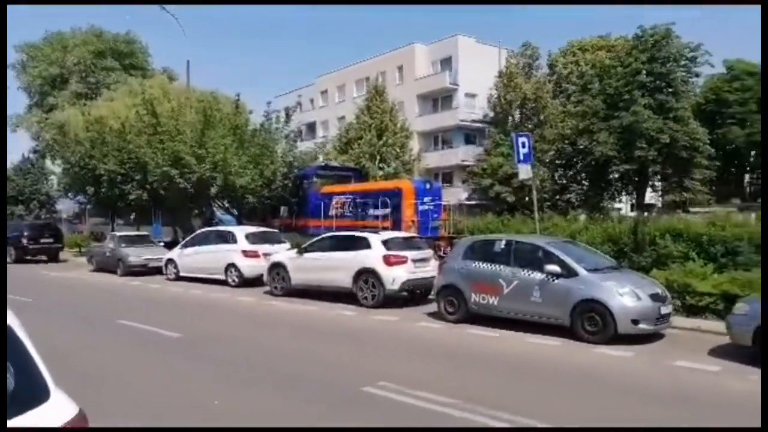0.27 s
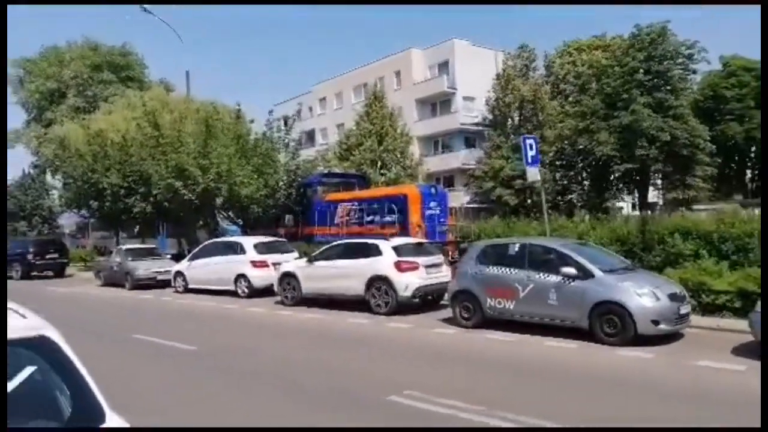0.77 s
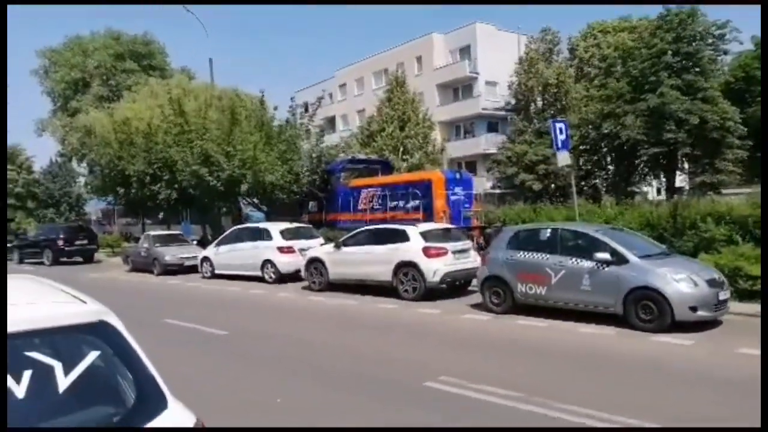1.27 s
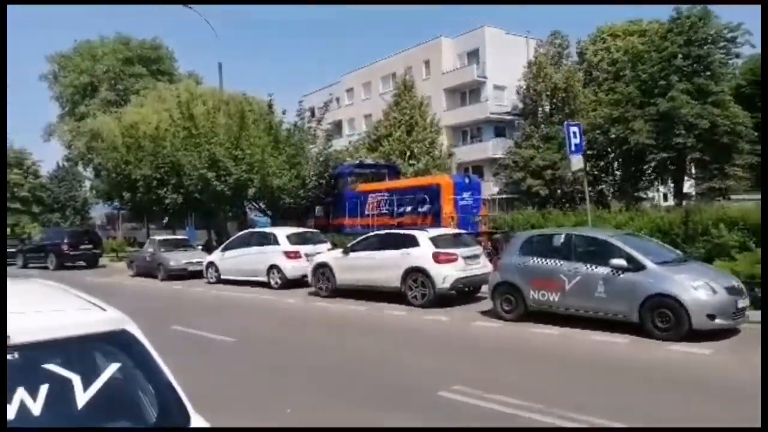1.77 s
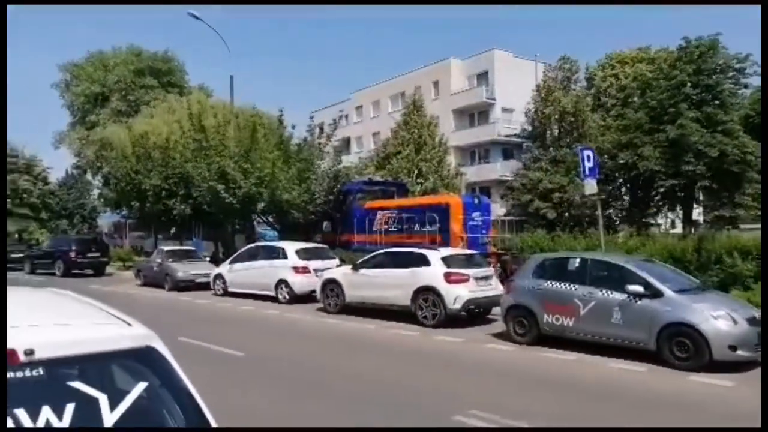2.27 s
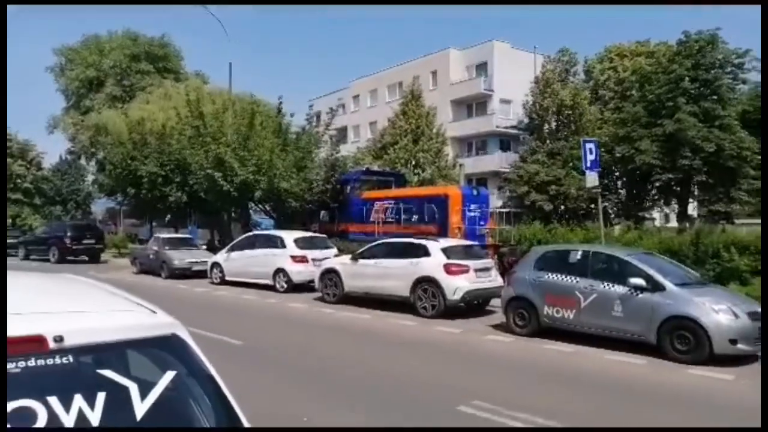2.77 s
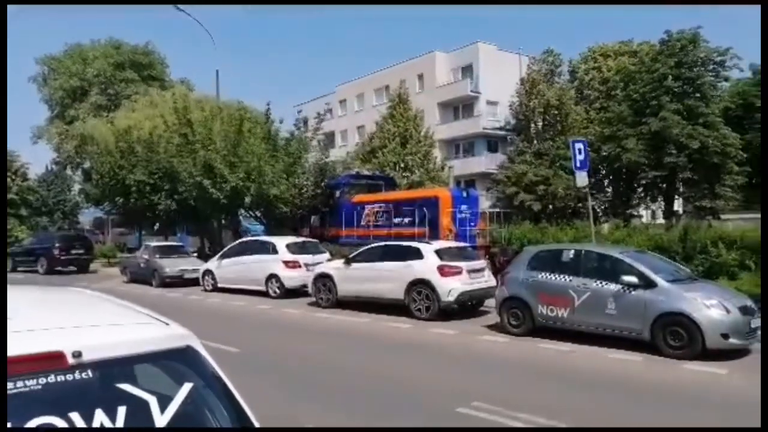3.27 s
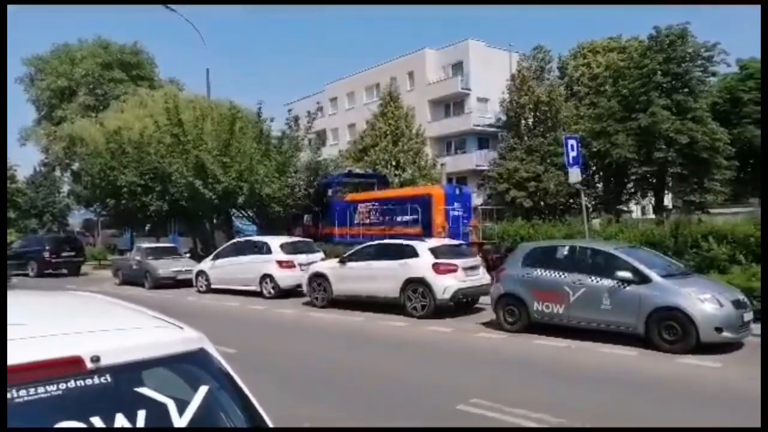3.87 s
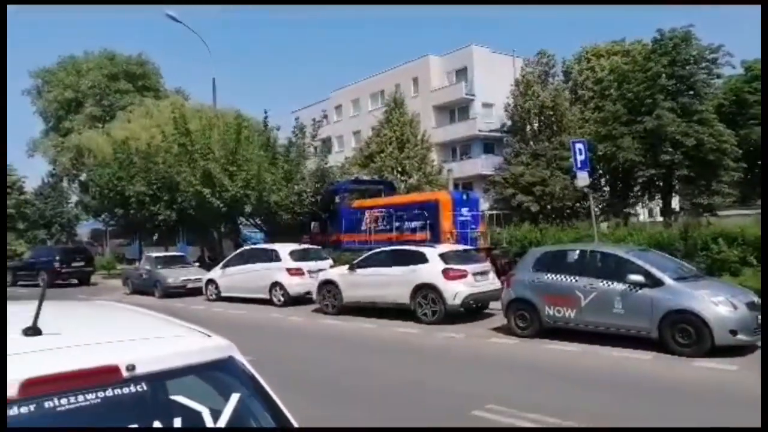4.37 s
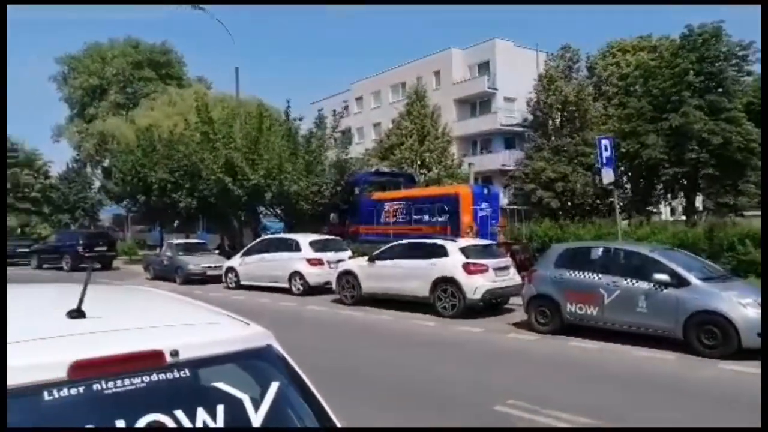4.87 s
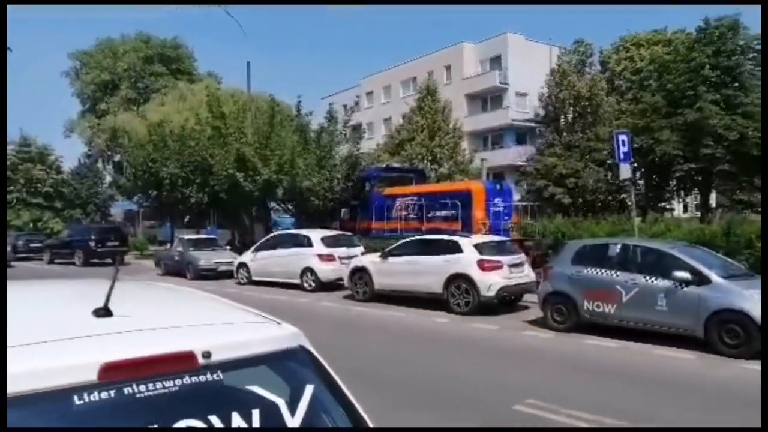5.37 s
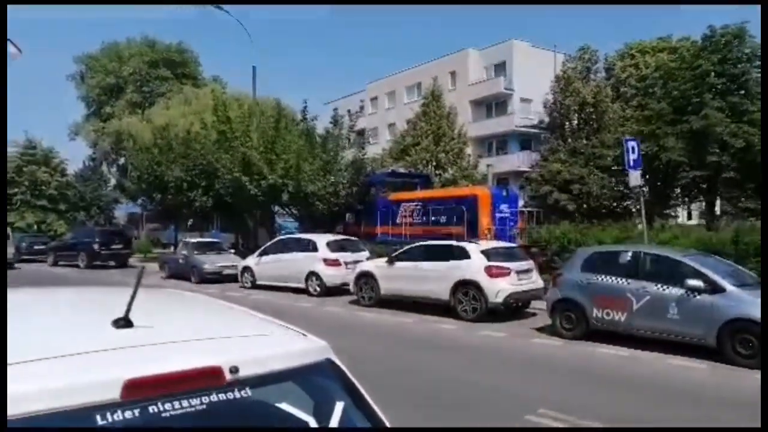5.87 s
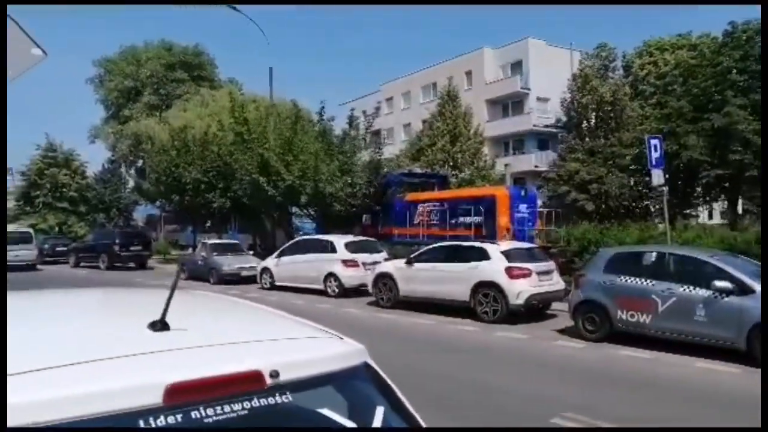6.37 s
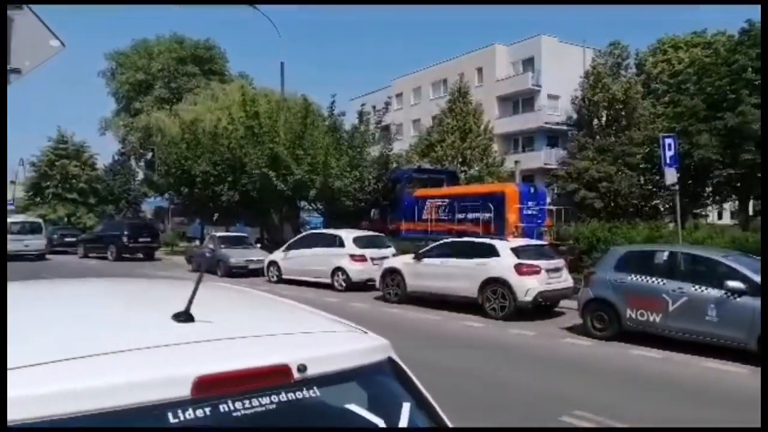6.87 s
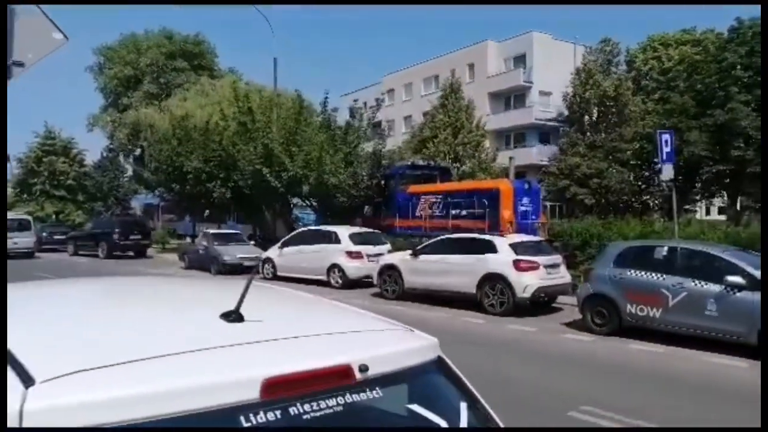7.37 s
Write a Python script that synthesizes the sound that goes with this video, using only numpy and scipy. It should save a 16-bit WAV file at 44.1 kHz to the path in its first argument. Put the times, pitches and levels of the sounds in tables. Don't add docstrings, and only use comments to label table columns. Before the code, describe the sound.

Steady low engine drone and airy hiss with faint metal ticks, then a two-second echoing air-horn blast that sags, and the engine taking load.

```python
import sys
import numpy as np
from scipy import signal
from scipy.fft import rfft, irfft, next_fast_len
from scipy.io import wavfile
from scipy.ndimage import map_coordinates

SR = 44100
rng = np.random.default_rng(int(sys.argv[2]) if len(sys.argv) > 2 else 0)


def level_to_linear(level):
    exponent = np.asarray(level, float) / 20
    return 10 ** exponent


def inscribe(sig):
    pcm = np.round(np.clip(np.atleast_2d(sig).T, -1, 1) * 32767)
    wavfile.write(sys.argv[1], SR, pcm.astype(np.int16))


N = 336483


def unit(x):
    return x / np.sqrt(np.mean(x ** 2) + 1e-20)


def along(points, hz):
    f, v = np.transpose(points)
    return np.interp(np.log(hz + 1), np.log(f + 1), v)


def curves(rows):
    s, *cols = np.transpose(rows)
    return [np.interp(np.arange(N) / SR, s, c) for c in cols]


def ramp(start_s, length_s):
    return np.clip((np.arange(N) / SR - start_s) / length_s, 0, 1)


def wobble(rate, size=1):
    step = np.arange(0, N + 64, 64)
    knots = rng.standard_normal(int(N * rate / SR) + 4)
    return np.interp(np.arange(0, N, size), step, map_coordinates(knots, [step * rate / SR]))


def filtered(x, response):
    m = next_fast_len(N + SR // 2)
    return irfft(rfft(x, m) * response(np.fft.rfftfreq(m, 1 / SR)), m)[..., :N]


# frequency in Hz, left-right correlation from -1 to 1.
ALIKE = [(60, 0.93), (130, 0.91), (290, 0.87), (630, 0.67), (1380, 0.25), (3010, 0.68), (6590, 0.22),
         (14400, -0.1)]


def rush(gain):
    turn = lambda hz: np.arccos(np.clip(along(ALIKE, hz), -1, 1)) / 2
    mid_side = lambda hz: gain(hz) * [np.cos(turn(hz)), np.sin(turn(hz))]
    mid, side = filtered(rng.standard_normal((2, N)), mid_side)
    return unit(np.array([mid + side, mid - side]))


def throttle():
    return ramp(5.93, 0.73)


# time in seconds, level in dB.
TRAFFIC = [(0, -48.5), (.5, -43.5), (1.3, -49), (3, -47.5), (3.8, -45.5), (6.8, -40), (7.63, -45.5)]
# frequency in Hz, density in dB per Hz.
RUMBLE = [(12, -47.5), (20, -13.5), (60, -6), (143, -3.5), (216, -8), (365, -11), (450, -26), (700, -54.5)]


def street_rumble():
    rumble_db = curves(TRAFFIC)[0] + 2 * throttle()
    return level_to_linear(rumble_db + 0.5 * wobble(3)) * rush(lambda hz: level_to_linear(along(RUMBLE, hz)))


# time in seconds, peak level in dB.
TICKS = [(0.4798, -57), (2.6379, -57), (2.6893, -48), (3.471, -59), (3.8477, -58)]
# time in seconds, peak level in dB.
SPITS = [(0.7567, -61), (2.6893, -64), (3.471, -68), (7.0494, -58)]
# time in seconds, peak level in dB.
KNOCKS = [(0.0544, -46), (0.2224, -46), (0.2344, -45)]


def metal_ticks():
    when, size = rng.random(size=14), rng.standard_normal(size=14)
    crackle = list(zip(when * (N / SR - .1), -69 + 1.5 * size))
    clicks = ticks(TICKS, low_hz=3500, high_hz=12000)
    clicks += ticks(SPITS + crackle, low_hz=8500, high_hz=13000)
    return clicks + level_to_linear(10) * ticks(KNOCKS, low_hz=2500, high_hz=4500)


def ticks(events, low_hz, high_hz):
    out, t = np.zeros((2, N)), np.arange(600) / SR
    for s, db in events:
        common, own = rng.standard_normal(len(t)), rng.standard_normal((2, len(t)))
        out[:, round(s * SR):][:, :len(t)] += level_to_linear(db + 4 - 60 * t / .016) * (common + .6 * own)
    return filtered(out, lambda hz: 1 / (1 + (low_hz / (hz + 1)) ** 4) / (1 + (hz / high_hz) ** 8))


# frequency in Hz, rms level in dB.
WHINES = [(294.8, -52), (354.3, -56.5), (521.5, -62), (430, -77.5)]


def whines():
    total = 0
    for hz, db in WHINES:
        level = level_to_linear(db + 1.5 * wobble(5))
        total = total + level * np.sin(2 * np.pi * hz * np.arange(N) / SR + .4 * wobble(6))
    return total


# centre in Hz, half width in Hz, level in dB.
BLOWER = [(3800, 110, 3), (5740, 430, -7.5), (9350, 400, -18), (2020, 400, -5.5)]


def blower(load, hiss_db):
    bands = lambda hz: sum(level_to_linear(db) / (1 + ((hz - centre) / width) ** 2) for centre, width, db in BLOWER)
    return level_to_linear(hiss_db - 12 + 1.7 * load + 1.6 * wobble(8.7)) * rush(bands)


# frequency in Hz, density in dB per Hz.
HISS = [(200, -42), (408, -7.5), (700, -2.5), (989, -8.5), (1300, -8), (1950, -5.5), (2600, -11),
        (3250, -17.5), (4500, -18.5), (6200, -21), (7000, -30.5), (8600, -31.5), (10800, -38.5),
        (14900, -60.5)]


def chopped_hiss(load, shaft, hiss_db):
    top_db = -2.5 + 7 * np.exp(-np.arange(N) / SR / 0.37)
    firing = 1 + .06 * np.sin(shaft)
    for order in (3, 4, 12):
        firing += .05 * np.sin(order * shaft)
    hiss = rush(lambda hz: level_to_linear(along(HISS, hz)))
    over = lambda edge_hz: filtered(hiss, lambda hz: 1 / (1 + (edge_hz / (hz + 1)) ** 8))
    load_change = (level_to_linear(-2.5 * load) - 1) * over(4200)
    tyres_change = (level_to_linear(top_db + .8 * wobble(17)) - 1) * over(6800)
    return (hiss + load_change + tyres_change) * level_to_linear(hiss_db + 0.86 * wobble(4)) * firing


# multiple of the shaft rate, level in dB.
EXHAUST = [(0.5, -33), (1, -31), (1.5, -23), (2, -17), (2.5, -24.5), (3, -14), (3.5, -19.5), (4, -7.5),
           (4.5, -11), (5, -17.5), (5.5, -13.5), (6, -16.5), (6.5, -12.5), (7, -18.5), (7.5, -20), (8, 1.5),
           (8.5, -9.5), (9, -18.5), (9.5, -11), (10, -10.5), (10.5, -18.5), (11, -17.5), (11.5, -21.5),
           (12, -15.5), (12.5, -24.5), (13, -33.5), (13.5, -28), (14, -24.5), (14.5, -19), (15, -15)]
# multiple of the shaft rate, gain in dB.
LOADED = [(1, 4.5), (3.5, 10.5), (4, 13.5), (4.5, 3.5), (8, -1.5), (15, 0.5)]


def exhaust(load, shaft):
    sway = lambda rate: wobble(rate, size=16)
    drone = 0
    for order, db in EXHAUST:
        sway_db = 1.7 * sway(5.3) + 0.51 * np.array([sway(3.8), sway(9.4)])
        drift = rng.uniform(0, 2 * np.pi) + .22 * sway(3.7) + .25 * np.array([sway(2.8), sway(3)])
        level = level_to_linear(db + load[::16] * along(LOADED, order) + sway_db)
        drone = drone + level * np.sin(order * shaft[::16] + drift)
    return signal.resample_poly(drone, 16, 1, axis=1)[:, :N]


# time in seconds, load from 0 to 1, exhaust drone in dB.
ENGINE = [(0, .4, -46), (.5, .34, -45), (1, .02, -44), (1.6, .02, -42.5), (2.4, .1, -42.5),
          (3.7, .2, -44.5), (4.3, .02, -46.5), (6.4, .1, -45), (6.8, .1, -42), (6.95, .82, -43.5),
          (7.45, .98, -39.5), (7.63, .97, -42.5)]
# frequency in Hz, left-right difference in dB.
LEAN = [(60, 3), (110, 0), (200, 6), (370, 3.5), (690, 1.5), (1260, -1.5), (2320, 1), (4270, 0),
        (7850, -4.5), (14400, 10.5)]


def engine_and_street():
    load, drone_db = curves(ENGINE)
    hiss_db = -44 + 3.5 * throttle()
    shaft_hz = 17.5 * (1 + 0.0022 * wobble(1.996))
    shaft = 2 * np.pi * np.cumsum(shaft_hz) / SR
    tones = np.sqrt(2) * (level_to_linear(drone_db) * exhaust(load, shaft) + whines())
    total = tones + street_rumble() + chopped_hiss(load, shaft, hiss_db) + blower(load, hiss_db)
    before_db, after_db = -0.64, -4.5
    swing_db = before_db + (after_db - before_db) * ramp(4.5, 0.76)
    ports = np.array([[.5], [-.5]])
    lag = lambda hz: np.exp(-2j * np.pi * hz * 5e-5 * ports)
    return level_to_linear(swing_db * ports) * filtered(total, lambda hz: level_to_linear(along(LEAN, hz) * ports) * lag(hz))


# frequency in Hz, 60 dB decay time in seconds.
STREET = [(300, 0.35), (1000, 2.73), (3800, 1.33), (10000, 0.5)]


def street(x, gap_s):
    hz, t, z = signal.stft(rng.standard_normal((2, 3 * SR // 2)), SR, nperseg=256)
    decay = level_to_linear(-60 * t / along(STREET, hz)[:, None])
    tail = signal.istft(z * decay, SR, nperseg=256)[1]
    late = np.pad(x, (int(gap_s * SR), 0))[None]
    return signal.fftconvolve(late, tail / np.linalg.norm(tail[0]), axes=1)[:, :N]


# delay in ms, level in dB.
WALLS_LEFT = [(0.14, -2.3), (3.83, -10.06), (15.68, -8.96), (30.64, -10.79), (42.79, -14.15),
              (44.46, -11.79), (52.62, -14.11), (131.46, -22.65), (175.72, -19.07)]
# delay in ms, level in dB.
WALLS_RIGHT = [(0.08, -0.15), (0.55, -15.2), (3.83, -8.86), (4.95, -4.13), (38.14, -18.13), (38.74, -10.03),
               (55.98, -14.77), (75.23, -14.12), (118.93, -12.37), (166.81, -17.9)]


def walls(x):
    echo = lambda hz, ms, db: level_to_linear(db) * np.exp(-2j * np.pi * hz * ms / 1000)
    port = lambda hz, rows: sum(echo(hz, ms, db) for ms, db in rows)
    return filtered(x, lambda hz: np.array([port(hz, WALLS_LEFT), port(hz, WALLS_RIGHT)]))


# partial number, level in dB at full pressure, dB gained per dB of pressure.
LOW = [(1.0, -7.5, 0.84), (2.0, -4, 0.8), (3.0, -15.5, 0.91), (4.0, -17, 1.04), (5.0, -17.5, 2),
       (6.0, -25, 1.25)]


def low_partials(on, phase, pressure_db, valve):
    low, scattered = np.zeros((2, N))
    for k, db, grows in LOW:
        level = level_to_linear(db + grows * pressure_db[on] + (0.8 + 0.31 * k) * wobble(25)[on])
        partial = level * np.sin(k * phase - 0.91 * (k - 1) ** 2) * np.sqrt(2) * valve[on]
        low[on] += partial
        scattered[on] += level_to_linear(-31 + 4.5 * k) * partial
    return low, scattered


# partial number, level in dB.
BELL = [(7, -14.5), (8, -19), (9, -22), (10, -18.5), (11, -17.5), (12, -23), (15, -21.5), (19, -27.5),
        (27, -32.5), (30, -41), (36, -52), (42, -61)]


def upper_partials(on, phase, pitch, pressure_db, level):
    upper, order = np.zeros(N), np.arange(7, 43)[:, None]
    fade_hz = 2500 + 33000 * level_to_linear(3.58 * pressure_db[on])
    buzz = level_to_linear(-14.5) * (np.minimum(order, 28) / 21.6) ** 2
    steep = level_to_linear(-9 * (order * pitch[on] / fade_hz) ** 2) + buzz
    partials = level_to_linear(along(BELL, order)) * steep * np.sin(order * phase - .3 * order ** 2)
    upper[on] = np.sum(partials, axis=0) * level[on]
    return upper


# time in seconds, pitch in Hz, air pressure in dB.
HORN = [
    (4.86, 370.5, -31),
    (4.92, 363.2, -14),
    (4.98, 352.0, -2.5),
    (5.08, 349.1, -0.6),
    (5.45, 351.13, -0.6),
    (5.9, 359.48, -5),
    (6.35, 364.5, -10.3),
    (6.78, 359.1, -33.5),
    (6.93, 340.8, -35),
]
# delay in seconds, level in dB over the scattered sound.
FAR_WALL = (.27, -10)


def horn():
    valve = ramp(HORN[0][0], .014) * (1 - ramp(HORN[-1][0] - .027, 0.038))
    on = valve > 0
    pitch, pressure_db = curves(HORN)
    upper_db = -10.5 + 1.16 * pressure_db
    phase = (2 * np.pi * np.cumsum(pitch * (1 + 0.00039 * wobble(40))) / SR)[on]
    low, scattered = low_partials(on, phase, pressure_db, valve)
    upper = upper_partials(on, phase, pitch, pressure_db, level_to_linear(upper_db) * valve)
    air = lambda hz: (hz > 250) / (1 + (hz / 1500) ** 4) + level_to_linear(-19) / (1 + (hz / 7000) ** 4)
    breath = level_to_linear(upper_db - 22.5) * valve * rush(air)
    delay_s, wall_db = FAR_WALL
    far = level_to_linear(wall_db) * np.roll(scattered, int(delay_s * SR))
    reverberant = level_to_linear([[-1.5], [1.5]]) * street(upper + scattered, gap_s=.012)
    return walls(low + level_to_linear(-5) * upper) + reverberant + far + breath


def scene():
    return engine_and_street() + metal_ticks() + horn()


def top_cut(x):
    return signal.sosfilt(signal.butter(12, 15030, fs=SR, output="sos"), x)


def record(dry):
    knee_db, squeeze, lag_s = -23, 0.4, 0.073
    step = 1 / (lag_s * SR)
    power = signal.lfilter([step], [1, step - 1], np.mean(dry ** 2, axis=0))
    heard_db = 10 * np.log10(power + 1e-12)
    level = dry * level_to_linear(-squeeze * np.clip(heard_db - knee_db, 0, None))
    level = level / (1 + np.abs(level / .82) ** 6) ** (1 / 6)
    return top_cut(level)


dry = scene()
out = record(dry)
inscribe(out)
```